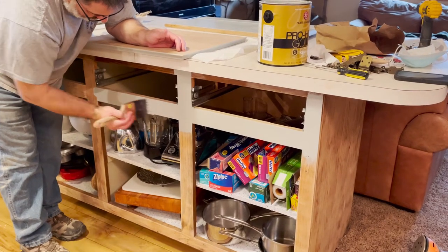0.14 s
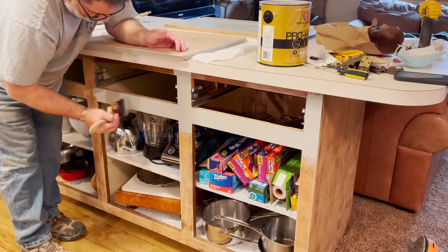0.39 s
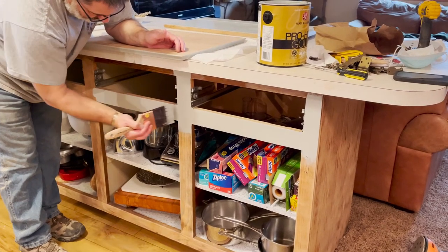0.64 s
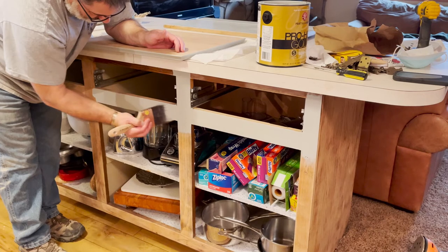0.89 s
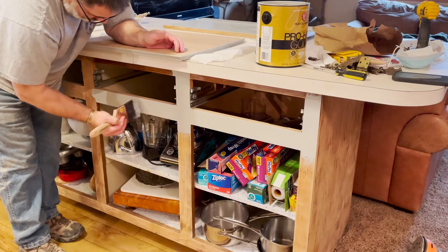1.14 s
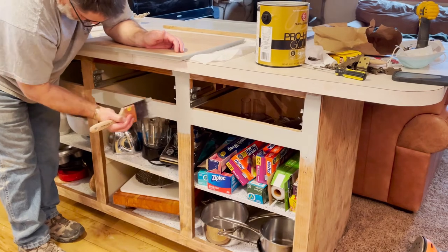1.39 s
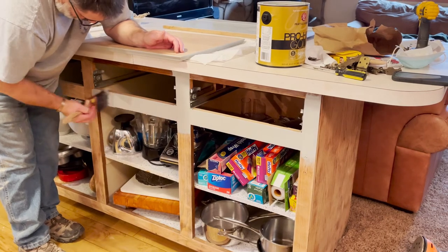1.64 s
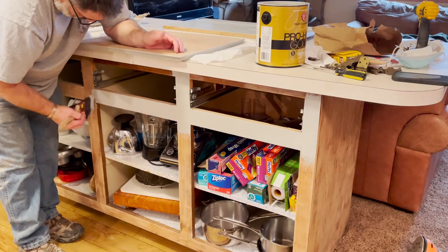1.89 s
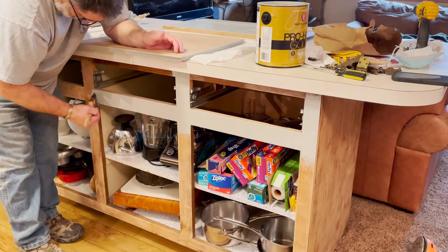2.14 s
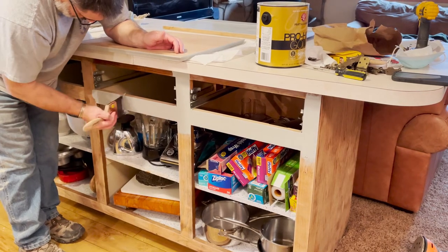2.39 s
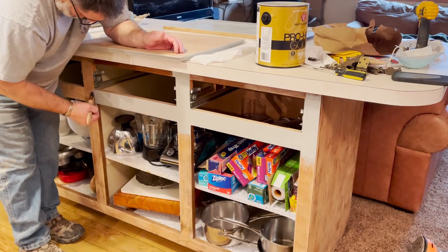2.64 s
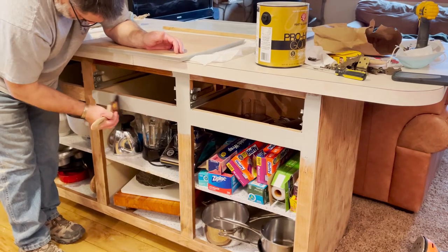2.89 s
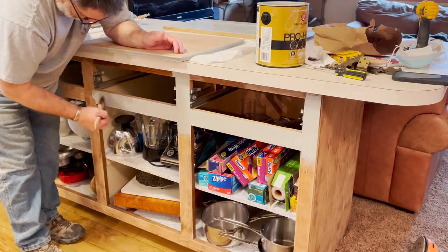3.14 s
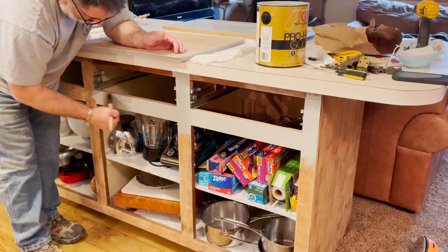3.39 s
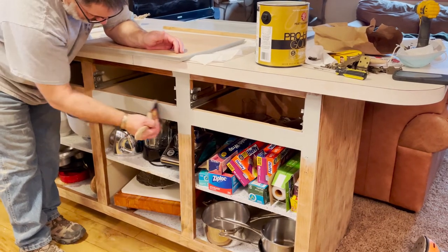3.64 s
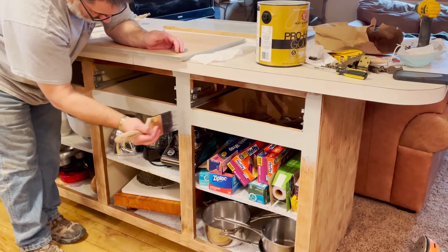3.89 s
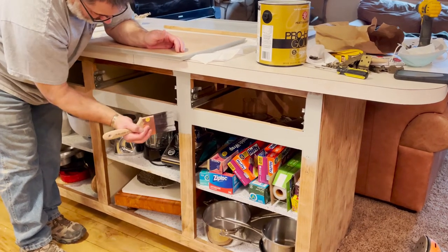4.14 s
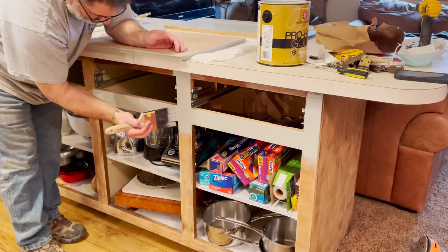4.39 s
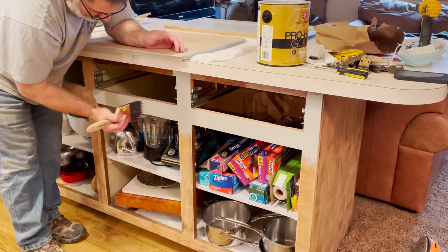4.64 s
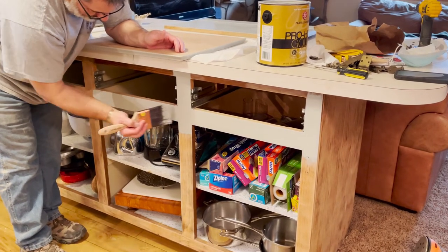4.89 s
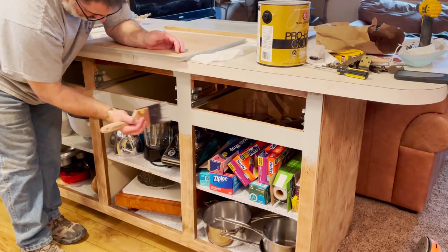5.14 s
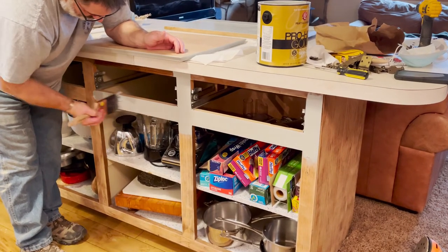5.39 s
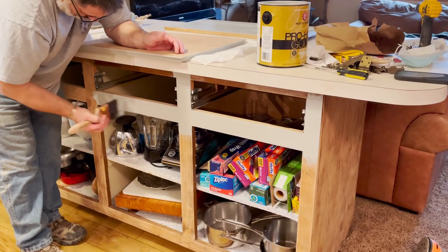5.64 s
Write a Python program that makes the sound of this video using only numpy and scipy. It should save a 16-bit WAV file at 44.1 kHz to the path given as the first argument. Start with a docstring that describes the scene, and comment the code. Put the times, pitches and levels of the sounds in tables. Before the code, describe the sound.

A wet paintbrush swishes and rasps in short uneven strokes along a wooden cabinet rail, with light taps and soft hollow thumps over a low hum.

```python
"""Bristles hiss, swish wetly and rasp as a paintbrush strokes a cabinet rail; taps and hollow thumps join in.
A motor hums over a low rumble and airy hiss; glassware rings in one quick cluster of three clinks.
Strokes are random grains coloured and gated by contact; taps are noise bursts through frame resonances;
thumps and glass are decaying modes; the motor is shaft orders; the room is filtered noise.
Left and right differ in treble phase by steps."""
import sys
import numpy as np
from scipy import signal
from scipy.fft import rfft, irfft, next_fast_len
from scipy.io import wavfile
from scipy.ndimage import uniform_filter1d, map_coordinates

SR = 44100
rng = np.random.default_rng(int(sys.argv[2]) if len(sys.argv) > 2 else 0)


def boost_factor(decibels):
    """Convert a level in decibels to a linear amplitude factor."""
    exponent = np.asarray(decibels, float) / 20
    return 10 ** exponent


def wav_record(signal):
    """Record a signal, one row per channel, as 16-bit PCM in the file named by sys.argv[1]."""
    frames = np.transpose(np.atleast_2d(signal))
    bounded = np.clip(frames, -1, 1)
    # unit amplitude maps onto the largest positive 16-bit level
    quanta = np.round(bounded * 32767).astype(np.int16)
    wavfile.write(sys.argv[1], SR, quanta)


N = 254060

# brush pushes: (fully down at [s], hold [s], rail pressure [dB], bristle tips re pressure [dB],
# wet paint re pressure [dB])
PUSHES = [(0.064, 0.1, -55, -6.5, -4.5), (.215, .03, -54.5, -4, -6), (0.249, 0.058, -51.5, -6, -4.5),
          (.85, 0.099, -60.5, -25, -12.5), (0.984, 0.051, -50.5, -5, -6.5), (1.07, 0.066, -57, -2.5, -4),
          (1.23, 0.13, -59, -16, -9.5), (1.454, 0.16, -53, -4, -4.5), (1.656, 0.065, -52.5, -3.5, -1.5),
          (1.72, 0.08, -53.5, -8, -6.5), (1.83, .09, -60, -23, -13), (2.301, 0.047, -46.5, -10.5, -2.5),
          (2.37, 0.043, -51.5, -5, -4), (2.48, .04, -59, -8.5, 3), (2.56, 0.032, -67.5, -27, -0.5),
          (2.77, 0.045, -57.5, -10, -8.5), (2.86, 0.13, -54, -7, -5), (3.0, 0.018, -59, -10.5, -7),
          (3.41, 0.073, -61.5, -3.5, -7.5), (3.53, .04, -58, -2.5, -3.5), (3.59, 0.047, -48.5, -8, -7),
          (3.68, .13, -52, -7, -4), (4.1, 0.2, -68.5, -11, -8.5), (4.35, 0.08, -57.5, -12.5, -2.5),
          (4.51, 0.042, -54, -9.5, -6), (4.57, 0.094, -54, -6, -5), (5.165, 0.022, -56, -6.5, -4),
          (5.231, 0.11, -54, 0, -0.5), (5.35, 0.075, -53.5, -5.5, -1.5), (5.46, 0.063, -58.5, -1, -0.5)]


def unit(x):
    """Scales x to rms 1."""
    return x / np.sqrt(np.mean(x ** 2) + 1e-20)


def along(points, hz):
    """Interpolates (frequency [Hz], value) points on a log-frequency axis."""
    f, v = np.transpose(points)
    return np.interp(np.log(hz + 1), np.log(f + 1), v)


def wobble(knots_per_s):
    """A smooth random curve through normally distributed knots."""
    knots = rng.standard_normal(int(N * knots_per_s / SR) + 4)
    return map_coordinates(knots, [np.arange(N) * knots_per_s / SR])


def filtered(x, response):
    """Multiplies the spectrum of x by a complex response of frequency."""
    m = next_fast_len(N + SR // 2)
    hz = np.fft.rfftfreq(m, 1 / SR)
    return irfft(rfft(x, m) * response(hz), m)[..., :N]


def grains(per_s, spread_db):
    """Two streams of single-sample clicks at random times, with uneven sizes."""
    hit = rng.random((2, N)) < per_s / SR
    size = boost_factor(spread_db * rng.exponential(size=(2, N)))
    return hit * rng.standard_normal((2, N)) * size


def patchy(pair, depth_db, ridge_db=0):
    """Random gain over time and frequency: broad brief patches plus narrow, longer-lasting ridges."""
    z = signal.stft(pair, nperseg=1024, noverlap=768)[2]

    def field(bins, frames):
        """Smoothed noise over frequency bins and time frames."""
        over_hz = uniform_filter1d(rng.standard_normal(z.shape[1:]), bins, 0)
        return unit(uniform_filter1d(over_hz, frames, 1))

    gain_db = depth_db * field(10, 8) + ridge_db * field(2, 24)
    return signal.istft(z * boost_factor(gain_db), nperseg=1024, noverlap=768)[1][:, :N]


def stereo(pair, spectrum=((1, 0),)):
    """Colours a shared and a differing stream, then sets left-right likeness, balance and phase."""
    # left-right correlation: (frequency [Hz], likeness [0..1])
    likeness = [(30, 0.89), (80, 1), (150, 0.91), (300, 0.79), (600, 0.26), (1400, 0.46), (2300, 0.69),
                (4000, 0.86), (5200, 0.4), (6800, 0.11)]
    # treble likeness, nearly full on the phase plateaus: (frequency [Hz], likeness [0..1])
    treble_likeness = [(7400, .8), (7700, .995), (8600, .995), (9000, .85), (10500, .85), (11000, .995),
                       (12300, .995), (12800, .85), (14200, .8), (14500, .995)]
    # left phase ahead of right, stepped in the treble: (frequency [Hz], lead [half cycles])
    lead = [(0, 0), (2000, .1), (5000, .17), (6000, -.22), (7000, -.45), (7650, -1), (8800, -1),
            (10900, -2), (12350, -2), (14450, -3)]
    # left over right: (frequency [Hz], balance [dB])
    balance = [(30, 0), (100, .8), (1200, 1.3), (3500, 2.8), (6000, 1.8), (7500, 0)]

    def shares(hz):
        """Colour times the parts of the shared and the differing stream."""
        angle = np.arccos(np.clip(along(likeness + treble_likeness, hz), 0, 1)) / 2
        return boost_factor(along(spectrum, hz)) * [np.cos(angle), np.sin(angle)]

    def skews(hz):
        """Half the balance and lead to the left, the inverse to the right."""
        half_lead = np.exp(.5j * np.pi * np.interp(hz, *np.transpose(lead)))
        skew = boost_factor(along(balance, hz) / 2) * half_lead
        return np.array([skew, 1 / skew])

    mid, side = filtered(pair, shares)
    return filtered(np.array([mid + side, mid - side]), skews)


def in_band(x, lo_hz, hi_hz):
    """Scales x so that its left-right mean has rms 1 within a band."""
    return x / np.std(filtered(x.mean(0), lambda hz: (hz > lo_hz) & (hz < hi_hz)))


def room():
    """Low rumble and faint airy hiss: noise with patchy gain and fixed spectra."""
    # low rumble: (frequency [Hz], relative level [dB])
    rumble_spectrum = [(12, -23.5), (25, -19.5), (40, -1), (60, 0), (120, -2), (150, -7.5), (200, -8.5),
                       (240, -8), (400, -12), (480, -17), (600, -21.5), (900, -29.5), (1200, -62)]
    # air of the room: (frequency [Hz], relative level [dB])
    air_spectrum = [(500, -12), (1000, 0), (1400, 0), (1900, -1.5), (2400, -12), (3000, -15.5), (5000, -18),
                    (8000, -21), (11000, -27.5), (13000, -34), (13500, -44), (14400, -60)]
    rumble = unit(stereo(patchy(rng.standard_normal((2, N)), depth_db=1.7), rumble_spectrum))
    air = unit(stereo(patchy(rng.standard_normal((2, N)), depth_db=1.2, ridge_db=2.5), air_spectrum))
    return boost_factor(-36.0) * rumble + boost_factor(-59.5) * air


def motor():
    """Sines at multiples of a slightly unsteady shaft rate, each drifting in level."""
    # shaft orders: (multiple of shaft rate, median rms level [dB])
    orders = [(4, -43), (5, -66.5), (7, -54), (8, -52), (9, -57), (12, -60.5), (16, -67)]
    shaft_hz = 45.27 * (1 + 0.00299 * wobble(3.993))
    angle = 2 * np.pi * np.cumsum(shaft_hz) / SR
    hum = 0
    for k, db in orders:
        gain = boost_factor(db + 2.35 * wobble(8.3)) * np.sqrt(2)
        hum = hum + gain * np.sin(k * angle + rng.uniform(0, 2 * np.pi))
    return hum


def thumps():
    """Soft blows: the carcass swells into a boom of close, beating modes; panel and shelf answer briefly."""
    # blows: (time [s], relative boom level [dB], panel re boom [dB], knock re boom [dB])
    blows = [(0.043, -15, -14.5, -15), (0.774, -20, -18.5, -20), (1.383, -18, -11, -16.5),
             (1.433, -30, 1, -19), (4.285, -17, -21.5, -15.5), (4.389, -22, -12.5, -24),
             (5.044, -12.5, -26.5, -23)]
    # hollow carcass: (frequency [Hz], relative level [dB], t60 [s])
    boom_modes = [(93.95, -0.5, 0.43), (100.8, 5.5, 0.28), (134, 7.5, 0.11)]
    # side panel: (frequency [Hz], relative level [dB], t60 [s])
    panel_modes = [(232.9, 7.5, 0.18), (255, -1.5, 0.31)]
    # shelf edge: (frequency [Hz], relative level [dB], t60 [s])
    knock_modes = [(428.5, 8.5, .12), (468, 3, 0.092)]
    out, t = np.zeros(N + SR), np.arange(SR // 2) / SR

    def ring(modes, rise_s):
        """Decaying sines with a soft onset."""
        tones = sum(boost_factor(db - 60 * t / t60) * np.sin(2 * np.pi * hz * t) for hz, db, t60 in modes)
        return (1 - np.exp(-t / rise_s)) * tones

    boom, panel, knock = ring(boom_modes, 0.044), ring(panel_modes, 0.0054), ring(knock_modes, 0.0048)
    for s, db, panel_db, knock_db in blows:
        blow = boom + boost_factor(panel_db) * panel + boost_factor(knock_db) * knock
        out[round(s * SR):][:len(t)] += boost_factor(db) * blow
    return out[:N] * boost_factor([[.6], [-.6]])  # 1.2 dB louder on the left


def frame_response(hz):
    """Causal resonances of frame and rail, summed with alternating sign."""
    # frame and rail: (frequency [Hz], width [Hz], relative level [dB])
    frame_modes = [(600, 60, 0), (810, 90, 0), (1020, 60, 0), (1270, 70, -2), (1600, 60, 1), (1851, 50, 0),
                   (1950, 50, 0), (2073, 45, 0), (2450, 90, 0), (2620, 60, -1), (2900, 70, -1),
                   (3240, 60, -3)]
    total = 0
    for k, (centre, width, db) in enumerate(frame_modes):
        damping = 1j * hz * width
        total = total + (-1) ** k * boost_factor(db) * damping / (centre ** 2 - hz ** 2 + damping)
    return total


def contact(over_db, swing):
    """Gain from the power sum of all pushes; swing scales the dB slopes of landing and lifting."""
    land_db_per_s, lift_db_per_s = 268, 298  # at swing 1
    s, hold_s, pressure_db = np.transpose(PUSHES)[:3, :, None]
    t = np.arange(0, N / SR + .002, .002)
    landing_db = land_db_per_s * np.maximum(s - t, 0)
    lifting_db = lift_db_per_s * np.maximum(t - s - hold_s, 0)
    power = boost_factor(pressure_db + over_db - swing * (landing_db + lifting_db)) ** 2
    return np.interp(np.arange(N) / SR, t, np.sqrt(power.sum(0)))


def brush():
    """Thousands of bristle slips a second: bright hiss, wet swish, and rasp through the rail's resonances."""
    # bristle tips: (frequency [Hz], relative level [dB])
    tip_spectrum = [(2000, -30), (4000, -10), (6000, 1), (7500, 1), (10000, -3), (12000, -4.5), (14000, -4),
                    (15500, -4)]
    # wet paint: (frequency [Hz], relative level [dB])
    paint_spectrum = [(1500, -20), (2500, 1.5), (3500, 2.5), (5000, -1), (7000, -5.5), (10000, -10)]
    # rasping rail: (frequency [Hz], relative level [dB])
    rail_spectrum = [(300, -25.5), (700, 4.5), (1200, -3), (1900, 3), (2500, -3.5), (3500, -13.5),
                     (6000, -50)]
    tips_db, wet_db = np.transpose(PUSHES)[3:, :, None]
    tips = patchy(grains(15000, 0.78), depth_db=3.0)
    paint = patchy(grains(15000, 1.2), depth_db=1.5, ridge_db=2.0)
    slips = patchy(grains(12000, 0.97), depth_db=2.0, ridge_db=4.0)
    rail = filtered(slips, lambda hz: 1 + 0.27 * frame_response(hz))
    hiss = contact(tips_db, 1) * in_band(stereo(tips, tip_spectrum), 9500, 13500)
    # swish and rasp follow the contact more gently
    swish = contact(wet_db, 0.95) * in_band(stereo(paint, paint_spectrum), 3200, 5000)
    rasp = contact(0, 0.7) * in_band(stereo(rail, rail_spectrum), 1200, 2800)
    drag = boost_factor(0.32 * wobble(30))  # the drag on wet paint flutters
    return drag * (hiss + swish + rasp)


def taps():
    """Short noisy contacts ring the frame modes near two regions and scuff the bristles."""
    # frame taps: (time [s], relative ring level [dB], main region [Hz], lesser region [Hz],
    # relative scuff level [dB])
    hits = [(.754, -38, 1020, 1610, -50.5), (1.371, -33, 1940, 980, -37.5), (1.385, -31.5, 844, 1000, -49),
            (2.125, -52, 2460, 1632, -45.5), (2.707, -45, 1610, 2900, -35), (2.721, -44, 1660, 800, -34),
            (2.952, -34.5, 590, 816, -59), (4.282, -43, 1010, 2073, -44.5), (5.023, -44.5, 1550, 2300, -49)]
    # bristle scuff: (frequency [Hz], relative level [dB])
    scuff_spectrum = [(500, -8), (1500, 4.5), (2800, -3.5), (4500, -11), (9000, -14), (15000, -25)]
    out, t = np.zeros((2, N + SR)), np.arange(SR // 2) / SR
    hz = np.fft.rfftfreq(len(t), 1 / SR)
    rise_s, contact_s, region_octaves = .003, .02, .22
    touch = (1 - np.exp(-t / rise_s)) * np.exp(-(t / contact_s) ** 2)

    def around(centre_hz):
        """Bell-shaped weight over octaves from a centre."""
        return np.exp(-(np.log2((hz + 1) / centre_hz) / region_octaves) ** 2)

    def burst(spectrum):
        """Back to time, scaled to peak 1."""
        x = irfft(spectrum, len(t))
        return x / np.abs(x).max()

    for s, db, main_hz, lesser_hz, scuff_db in hits:
        force = rfft(rng.standard_normal((2, len(t))) * touch)
        near = around(main_hz) + .6 * around(lesser_hz)
        ring = burst(force * near * frame_response(hz))
        scuff = burst(force * boost_factor(along(scuff_spectrum, hz)))
        out[:, round(s * SR):][:, :len(t)] += boost_factor(db) * ring + boost_factor(scuff_db) * scuff
    return stereo(out[:, :N])


def glasses():
    """Shaken glassware rings faintly in decaying modes; chatter on the shelf makes each flutter."""
    # clinks: (time [s], relative level [dB])
    clinks = [(2.461, -56.5), (2.501, -53.5), (2.543, -56.5)]
    # glass modes: (frequency [Hz], relative level [dB], t60 [s])
    glass_modes = [(1965, -2, .5), (2790, -4, 0.22), (2830, -4, 0.29), (3800, -12, 0.27), (4640, -6, 0.26),
                   (4700, -5.5, 0.25), (5157, -17, .3), (5300, -6, 0.22), (6070, -6, .15)]
    out, t = np.zeros((2, N + SR)), np.arange(SR // 2) / SR
    onset = 1 - np.exp(-t / 0.0027)
    for s, db in clinks:
        for hz, mode_db, t60 in glass_modes:
            chatter_db = 6 * wobble(60)[:len(t)]
            gain = boost_factor(db + mode_db + chatter_db - 60 * t / t60) * onset
            tone = np.sin(2 * np.pi * (hz * t + rng.random()))
            out[0, round(s * SR):][:len(t)] += gain * tone  # shared stream only
    return stereo(out[:, :N])


def scene():
    """Room, motor, carcass, brush, frame and glassware together."""
    return room() + motor() + thumps() + brush() + taps() + glasses()


def low_pass(x):
    """Removes everything above the highest recorded frequency."""
    return signal.sosfilt(signal.butter(12, 15680, fs=SR, output="sos"), x)


def record(dry):
    """Turns the finished mix into the output."""
    return low_pass(dry)


dry = scene()
out = record(dry)
wav_record(out)
```